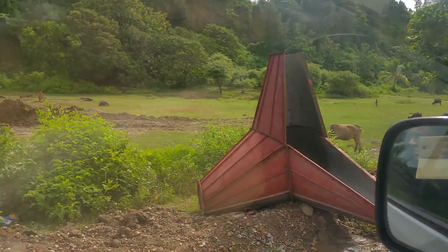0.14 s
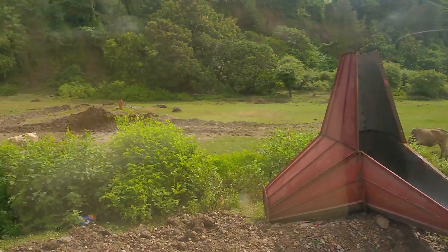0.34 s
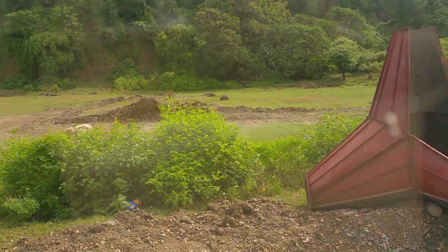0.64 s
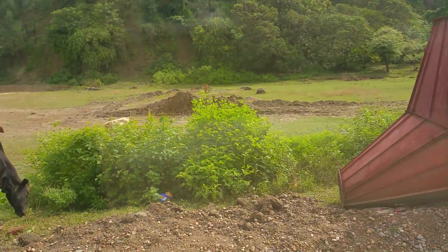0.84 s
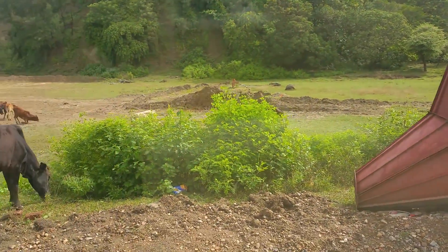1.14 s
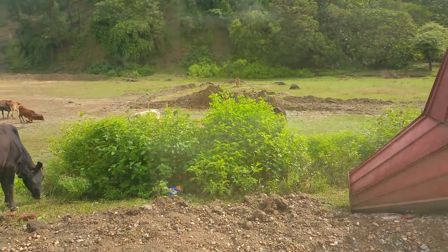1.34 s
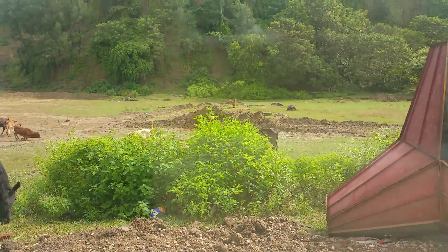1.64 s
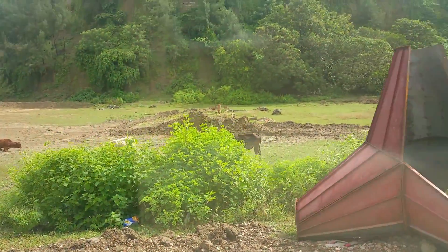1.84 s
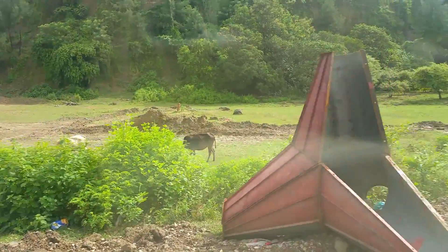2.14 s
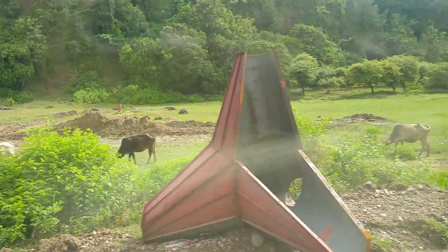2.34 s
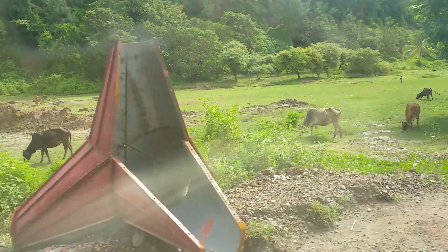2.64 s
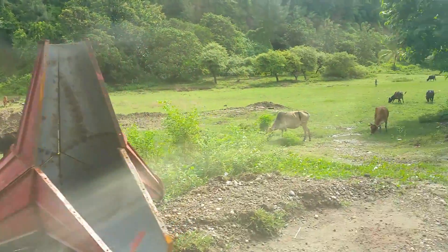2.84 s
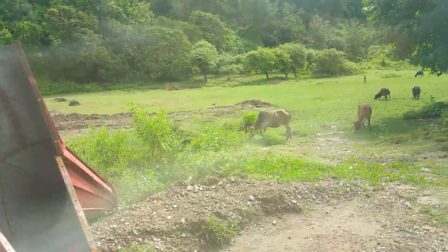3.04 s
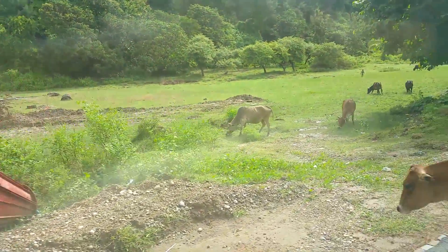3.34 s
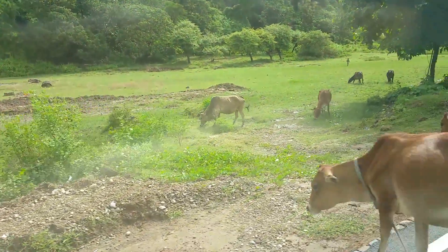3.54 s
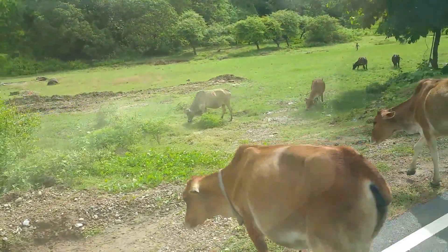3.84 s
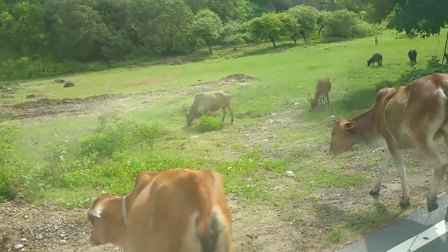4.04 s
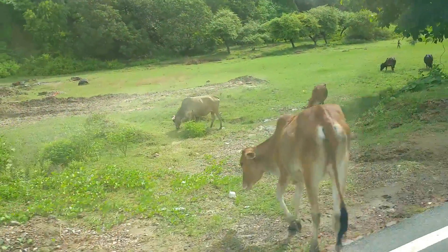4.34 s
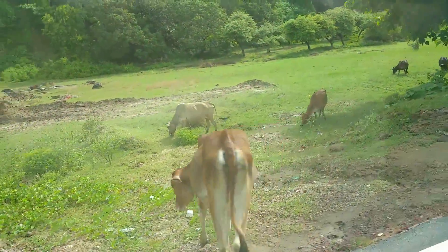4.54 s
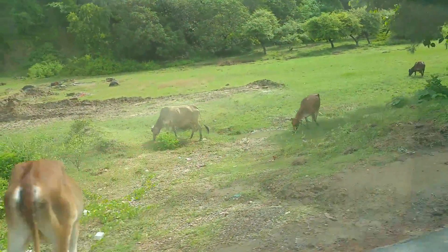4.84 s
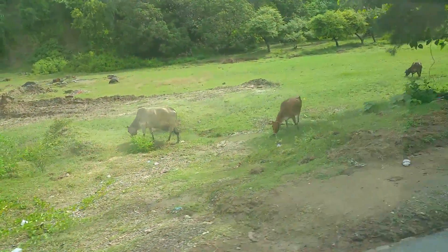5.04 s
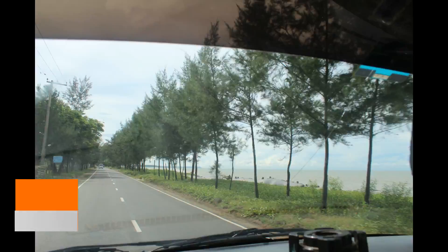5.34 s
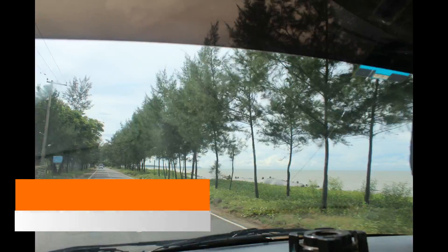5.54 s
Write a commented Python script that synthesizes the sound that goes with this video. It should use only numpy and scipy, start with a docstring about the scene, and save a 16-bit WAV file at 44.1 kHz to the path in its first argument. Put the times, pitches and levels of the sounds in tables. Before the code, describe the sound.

From the passenger seat of a car, a low body rumble and throbbing blower run throughout. The engine idles for nearly two seconds, then pulls away with a deep boom and growl that slowly climbs. Vent air hisses on the right with thin fluttering whistles; trim ticks drily and a few faint sliding hoots come from outside. It ends in a tiny stuck stutter and silence.

```python
"""A car engine idles, then pulls away with a rising boom: sine tones follow its firing rate, and noise growls.
A blower throbs steadily, made of tones at multiples of its turning rate. Filtered noise gives the rumble
of the body, the roar of the tyres and the air from a vent on the right; thin sine whistles flutter in it.
Trim ticks with noise and short rings, and a few faint sliding hoots come from outside.
At the end the sound sticks for a moment and stops."""
import sys
import numpy as np
from scipy import signal
from scipy.fft import irfft
from scipy.io import wavfile
from scipy.ndimage import uniform_filter1d

SR = 44100
rng = np.random.default_rng(int(sys.argv[2]) if len(sys.argv) > 2 else 0)


def store_wav(level_fs):
    """Save 16-bit WAV to argv[1]."""
    pcm = np.round(np.clip(np.atleast_2d(level_fs), -1, 1) * 32767)
    wavfile.write(sys.argv[1], SR, pcm.T.astype(np.int16))


N = 250929
T = np.arange(N) / SR  # time in seconds
FFT_SIZE = 2 ** 18
FREQS = np.maximum(np.fft.rfftfreq(FFT_SIZE, 1 / SR), 1)  # Hz

# colour of the bright hiss, in the vent's air and in the scuff of the ticks: [pitch_hz, relative_db]
HISS_COLOUR = [(2000, -8.5), (3500, 2.5), (4600, 2), (5400, 2.5), (6400, 1.5), (7600, -2), (8300, -7.5),
               (9200, -19.5), (10200, -17), (11700, -13.5), (14000, -30.5), (15700, -29)]


def undb(db):
    """Turn decibels into gain."""
    return 10 ** (np.asarray(db) / 20)


def across(points):
    """Read a (Hz, value) table at every frequency, joining the points on a log-frequency axis."""
    hz, value = np.transpose(points)
    return np.interp(np.log(FREQS), np.log(hz), value)


def walk(rate):
    """Smooth random wandering with a spread near 1; a higher rate (per second) wanders faster."""
    step = int(SR / rate)
    steps = np.repeat(rng.standard_normal(N // step + 1), step)
    smooth = uniform_filter1d(uniform_filter1d(steps, step), step)
    return 1.47 * smooth[:N]


def swell(full_at_s, hold_s, rise_s, fall_s):
    """A smooth rise to 1, a hold and a smooth fall."""
    early = np.maximum(full_at_s - T, 0)
    late = np.maximum(T - full_at_s - hold_s, 0)
    return np.exp(-(early / rise_s) ** 2 - (late / fall_s) ** 2)


def stereo_field():
    """Spread of the cabin noise: how much left and right differ, and how loud each one is."""
    # difference between the two sides of the cabin noise: [pitch_hz, side_minus_mid_db]
    side_table = [(30, -27.5), (60, -11.5), (120, -14), (200, -28.5), (300, -23), (400, -12), (640, 0.5),
                  (950, -4.5), (1350, 4.5), (1900, 1.5), (3000, 0.5), (15000, 0.5)]
    # balance of the cabin noise; the vent is on the right: [pitch_hz, left_minus_right_db]
    balance_table = [(60, 3.5), (200, -2.5), (380, 7.5), (700, -1.6), (1300, -0.5), (2400, -2), (4400, -3),
                     (6200, -15.5), (8000, -23), (11000, -12), (15000, -8)]
    side = undb(across(side_table)) * np.array([[1], [-1]])
    balance = undb(np.outer([.5, -.5], across(balance_table)))
    return side, balance / np.sqrt(np.mean(balance ** 2, axis=0))


def noise(gain, field):
    """Stereo noise shaped by a gain at each frequency; the average of left and right has rms 1."""
    side, balance = field
    real = rng.standard_normal((2, len(FREQS)))
    imaginary = rng.standard_normal((2, len(FREQS)))
    shared, opposite = real + 1j * imaginary
    out = irfft(gain * balance * (shared + side * opposite), FFT_SIZE)[:, :N]
    return out / np.sqrt(np.mean(out.mean(axis=0) ** 2))


def coloured_noise(colour, field):
    """Stereo noise with the spectrum of a colour table."""
    return noise(undb(across(colour)), field)


def random_phase():
    """A random starting point in a wave's cycle, in radians."""
    return rng.uniform(0, 2 * np.pi)


def panel_lift(hz):
    """Body panels sing along: the dB a tone gains as its pitch crosses their resonances."""
    # panels that sing: [pitch_hz, width_hz, lift_db]
    panels = [(197, 26, 4), (252, 16, 12), (290, 16, 8), (371, 24, 13), (406, 16, 11), (437, 14, 6),
              (675, 40, 8)]
    return sum(db / (1 + (2 * (hz - centre) / width) ** 2) for centre, width, db in panels)


def engine(field, hz, revs):
    """Firings make a boom and overtones that cross panels, the intake growls, the body drones at idle."""
    # harder pushes on the pedal: [full_at_s, hold_s, rise_s, boom_lift_db]
    pushes = [(1.96, .05, .08, 3.5), (2.418, 0.33, 0.098, 4.5), (4.33, 0.4, 0.45, 3), (4.999, .16, .06, 2)]
    # overtones; quarter multiples come from belt-driven parts: [multiple_of_firing_rate, relative_db]
    overtones = [(2, 5), (2.25, 0), (2.5, -3.5), (2.75, -4), (3, -1.5), (3.25, 1.5), (3.5, 2.5),
                 (3.75, -0.5), (4, -4.5), (4.5, -9), (4.75, -9), (5, -5), (5.5, -11.5), (6, -7.5),
                 (6.5, -18), (7, -21), (8, -26), (9, -13), (11, -20)]
    # body drone at idle: [multiple_of_firing_rate, level_db]
    idle_drone = [(4, -36.5), (5, -41), (6, -34), (7, -50), (8, -45.5), (9, -45.5), (10, -48.5)]
    # colour of the intake growl: [pitch_hz, relative_db]
    growl_colour = [(300, -23), (410, -2.5), (500, -2.5), (550, 8.5), (620, -1.5), (680, 4.5), (740, -10),
                    (850, -8.5), (1400, -45.5)]

    # the driver pulls away: the throttle opens over 0.11 s
    throttle = np.clip((T - 1.845) / 0.11, 0, 1)
    push_db = sum(db * swell(s, hold, rise, 0.069) for s, hold, rise, db in pushes)
    boom_db = -40 + 16.5 * throttle + push_db
    # revs count octaves above idle; the overtones take a small share of each push
    overtone_db = -46.5 + 7.5 * revs + 0.15 * push_db
    growl_db = -50.5 + 5.5 * revs

    phase = 2 * np.pi * np.cumsum(hz * (1 + 0.00041 * walk(9.3))) / SR
    boom = undb(boom_db + .5 * walk(25)) * np.sin(phase)

    tones, lift_db = 0, panel_lift(FREQS)
    for multiple, db in overtones:
        singing_db = np.interp(multiple * hz, FREQS, lift_db)
        uneven_db = .8 * walk(12)
        level = undb(overtone_db + db + singing_db + uneven_db)
        tones = tones + level * np.sin(multiple * phase + random_phase())
    tones = tones * undb([[1.0], [-1.0]])  # the overtones lean left

    drone = sum(undb(db) * np.sin(multiple * phase + random_phase()) for multiple, db in idle_drone)
    drone = drone * np.exp(-(revs / 0.12) ** 2)  # dies away as the revs leave idle
    chug = 1 + 0.54 * np.cos(phase)  # the growl pulses with each firing
    growl = coloured_noise(growl_colour, field) * undb(growl_db) * chug
    return np.sqrt(2) * (boom + drone + tones) + growl


def blower(thump_db):
    """An unbalanced fan wheel thumps once a turn; the duct delays the upper tones of each thump."""
    # tones of the fan: [multiple_of_turning_rate, relative_db]
    fan_tones = [(2, -29), (3, -29), (4, -32), (5, -26.5), (6, -32.5), (7, -49), (8, -44.5), (9, -40.5),
                 (10, -57.5)]
    turn_hz = 40.45 * (1 + 0.0016 * walk(4.935))
    turn = 2 * np.pi * np.cumsum(turn_hz) / SR
    arrival = turn - np.array([[0], [0.036]])  # radians; the left hears it first
    out = 0
    for multiple, db in fan_tones:
        wobble_db = .8 * walk(12)
        duct_delay = 0.2485 * multiple ** 2  # radians
        out = out + undb(db + wobble_db) * np.sin(multiple * arrival - duct_delay)
    return np.sqrt(2) * out * undb(thump_db + 0.64 * walk(40))


def road(field, body_db):
    """The body rumbles over the rough asphalt; the tyres roar dully above it."""
    # colours of the body rumble and of the tyre roar: [pitch_hz, relative_db]
    rumble_colour = [(20, -31), (35, 0.5), (58, -17.5), (90, -0.5), (125, 0), (175, -1.5), (225, -5),
                     (280, -10), (360, -10), (430, -16), (520, -32), (800, -66.5)]
    roar_colour = [(300, -18), (450, 8.5), (560, -0.5), (680, 2), (745, -7), (815, 0.5), (870, -2.5),
                   (935, -2.5), (1050, -19.5), (1500, -55)]
    body = coloured_noise(rumble_colour, field) * undb(body_db + 0.66 * walk(40))
    tyres = coloured_noise(roar_colour, field) * undb(-43 + 2.0 * walk(30))
    return body + tyres


def air(field, rush_db, vent_db):
    """Air rushes through the duct, hisses at the grille and sings faintly on its slats."""
    # colours of the rush in the duct and of the air at the vent: [pitch_hz, relative_db]
    rush_colour = [(500, -33.5), (800, 9.5), (1000, 1.5), (1200, 2.5), (1350, 3), (1520, -5), (1660, -4),
                   (2000, -9), (3000, -10.5), (5000, -43.5)]
    vent_colour = [(900, -20.5), (1650, -4), (1900, 6), (2100, 3.5), (2400, 3), (2800, -5), (3050, -9.5),
                   (3300, -10), (3800, -9), (4600, -19.5), (8000, -41.5)]
    # narrow whistles of the vent: [pitch_hz, width_hz, level_db]
    whistles = [(947, 82, -55), (1496, 62, -56.5), (3010, 100, -64.5), (5200, 120, -70)]

    hiss_db = -56 + 2 * swell(0.41, 0.39, .13, 0.95)  # brightens once
    out = np.zeros((2, N))
    for colour, db in ((rush_colour, rush_db), (vent_colour, vent_db), (HISS_COLOUR, hiss_db)):
        out += coloured_noise(colour, field) * undb(db + 0.96 * walk(25.14))
    for hz, width, db in whistles:
        narrow_band = 1 / (1 + ((FREQS - hz) / (width / 2)) ** 2)
        out += noise(narrow_band, field) * undb(db + 0.5 * walk(4.2))
    return out


def slat_whistles(field):
    """Now and then a slat catches the air and whistles in a thin flutter on an unsteady pitch."""
    # brief whistles, levels before flutter and balance: [full_at_s, hold_s, pitch_hz, level_db]
    flares = [(0.819, 0.47, 945, -50.5), (.25, 0.06, 1485, -56), (.54, 0.055, 1495, -55),
              (3.85, .08, 1520, -54), (4.04, 0.24, 1493, -57.5), (4.36, 0.157, 1493, -53),
              (4.623, 0.37, 2320, -62), (.23, .18, 3050, -62), (.78, 0.23, 3060, -58),
              (1.122, .08, 3050, -63), (1.268, 0.2, 3010, -59), (2.44, .15, 3000, -61),
              (0.185, .07, 5200, -67), (1.19, 0.22, 5240, -69), (1.9, .05, 5150, -61),
              (2.162, .28, 5270, -67)]
    out = np.zeros((2, N))
    _, balance = field
    wander_hz, size = 42 * walk(140), .8 + .6 * walk(70)
    fade_s = .05
    for s, hold, hz, db in flares:
        shape = swell(s, hold, fade_s, fade_s)
        on = shape > .01  # work only where it can be heard
        phase = 2 * np.pi * np.cumsum(hz + wander_hz[on]) / SR
        phase = phase - np.array([[0.97], [0]])  # radians; the left lags
        left_right = balance[:, [np.searchsorted(FREQS, hz)]]
        level = np.sqrt(2) * undb(db) * left_right
        out[:, on] += level * shape[on] * size[on] * np.sin(phase)
    return out


def ticks(field):
    """Plastic trim gives small dry ticks: a scuff of noise, a thin sizzle and a brief ring on the right."""
    # ticks, levels at the start of each: [start_s, scuff_db, ring_db, sizzle_db]
    tick_table = [(.271, -60, -68, -66), (.425, -48, -57, -66), (.555, -51, -63.5, -59),
                  (3.273, -52, -50, -72), (4.027, -48.5, -55, -66), (4.218, -57, -63.5, -78)]
    # what the trim rings with: [pitch_hz, relative_db]
    trim_modes = [(3100, 0.5), (5210, -2.5), (6050, 5), (7450, -5.5)]
    # colour of the thin sizzle: [pitch_hz, relative_db]
    sizzle_colour = [(8000, -22.5), (11000, -1), (15500, -5)]

    out = np.zeros((2, N))
    t = T[:SR // 10]
    noise_decay_s, ring_decay_s = 0.019, 0.012
    scuff = coloured_noise(HISS_COLOUR, field)
    sizzle = coloured_noise(sizzle_colour, field)
    for s, scuff_db, ring_db, sizzle_db in tick_table:
        start = round(s * SR)
        span = slice(start, start + len(t))
        ring = sum(undb(db) * np.sin(2 * np.pi * hz * t + random_phase()) for hz, db in trim_modes)
        ring = undb(ring_db) * ring * np.exp(-t / ring_decay_s)
        out[:, span] += undb([[-16], [0]]) * ring  # weaker on the left
        scrape = undb(scuff_db) * scuff[:, span] + undb(sizzle_db) * sizzle[:, span]
        out[:, span] += scrape * np.exp(-t / noise_decay_s)
    return out


def hoots():
    """Short, rough, sliding hoots from outside; the closed windows leave little but the fundamental."""
    # faint hoots, levels before roughness and echo: [start_s, length_s, from_hz, to_hz, level_db]
    hoot_table = [(.035, .085, 520, 565, -34), (.15, .04, 445, 430, -37), (.575, .04, 590, 605, -43),
                  (.595, .05, 750, 800, -45), (.68, .06, 820, 810, -41), (1.975, .09, 480, 555, -35),
                  (2.07, .1, 545, 552, -36.5), (2.7, .06, 535, 568, -37.5), (2.74, .05, 470, 430, -37),
                  (2.955, .075, 548, 615, -36), (3.065, .075, 610, 555, -37), (3.49, .06, 570, 595, -44)]
    out = np.zeros((2, N))
    roughness, size = 1 + .027 * walk(200), 1 + .33 * walk(140)
    lag_s = np.array([0, 0.00042])  # the right hears them later
    for start, length, from_hz, to_hz, db in hoot_table:
        part = np.clip((T - start) / length, 0, 1)
        on = (part > 0) & (part < 1)
        hz = (from_hz + (to_hz - from_hz) * part[on]) * roughness[on]
        phase = 2 * np.pi * (np.cumsum(hz) / SR - np.outer(lag_s, hz))
        shape = np.sqrt(2 * np.sin(np.pi * part[on])) * size[on]
        tone = np.sin(phase) + undb(-20) * np.sin(2 * phase)  # a faint octave on top
        out[:, on] += undb(db) * shape * tone
    return out


def cabin(x):
    """The small padded cabin adds a short dense tail of echoes, different at left and right."""
    t = T[:SR // 8]
    tail = rng.standard_normal((2, len(t))) * undb(-60 * t / 0.073)  # falls 60 dB in 0.073 s
    tail /= np.sqrt(np.sum(tail ** 2, axis=1, keepdims=True))
    return x + 0.46 * signal.fftconvolve(x, tail, axes=1)[:, :N]


def stick(x):
    """The last instant plays three times, clicking where its end meets its start; then silence."""
    stop, length = round(5.248 * SR), round(.029 * SR)
    start = stop - 3 * length
    last_instant = x[:, start:start + length]
    piece = last_instant * signal.windows.tukey(length, .15)
    piece = piece + undb(-23.0) * np.linspace(1, -1, length) ** 9  # a jump at each join clicks
    lead_in = np.linspace(0, 1, length)
    first = last_instant * (1 - lead_in) + piece * lead_in
    return np.hstack([x[:, :start], first, piece, piece, np.zeros((2, N - stop))])


def scene():
    """Everything heard from the passenger seat; the revs, two swells and a lull move the levels."""
    # engine speed, joined by straight lines: [time_s, firing_rate_hz]
    speed = [(0.0, 26.0), (0.6, 26.6), (1.08, 26.2), (1.22, 28), (1.51, 28.2), (1.8, 32), (1.9, 39),
             (2.0, 44.3), (2.16, 50.4), (2.4, 50.9), (2.88, 57.5), (3.7, 57.7), (4.0, 59), (4.4, 61),
             (4.85, 63.6), (5.15, 64.5)]
    # the rush of air swells and ebbs: [full_at_s, hold_s, fall_s, lift_db]
    rush_swells = [(0, 0.091, 0.76, 6), (2.715, 0.83, 0.34, 5)]

    field = stereo_field()
    hz = np.interp(T, *np.transpose(speed))
    revs = np.log2(hz / hz[0])  # octaves above idle
    swell_db = sum(db * swell(s, hold, 0.29, fall) for s, hold, fall, db in rush_swells)
    lull_db = -0.5 * swell(1.7, 0.67, 0.21, 0.21)  # fan and rumble dip briefly

    motor = engine(field, hz, revs)
    fan = blower(-0.8 - 0.5 * revs + lull_db)  # sinks a little as the revs rise
    # the rumble takes a small share of each swell of the air
    rolling = road(field, -25.5 + 0.44 * revs + 0.066 * swell_db + lull_db)
    draught = air(field, -46 + swell_db, -49.5 + 1.27 * revs)
    return motor + fan + rolling + draught + slat_whistles(field) + ticks(field) + cabin(hoots())


def record(dry):
    """The sound fades in over 6 ms, sticks and stops; everything above 15650 Hz is cut."""
    opening = np.minimum(T / .006, 1)
    top_cut = signal.ellip(10, .2, 80, 15650, fs=SR, output="sos")
    return signal.sosfilt(top_cut, stick(dry * opening))


dry = scene()
out = record(dry)
store_wav(out)
```